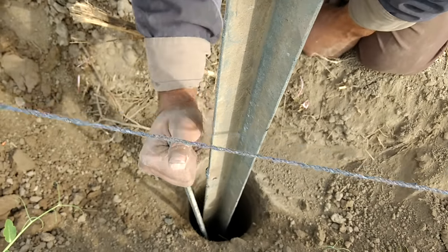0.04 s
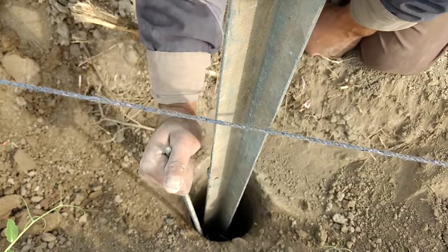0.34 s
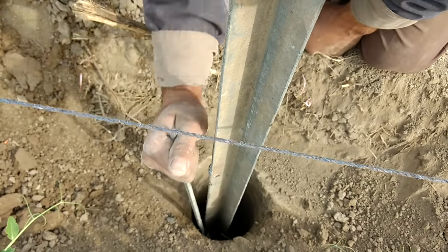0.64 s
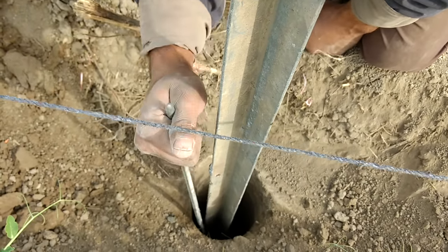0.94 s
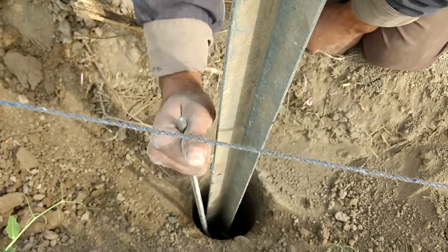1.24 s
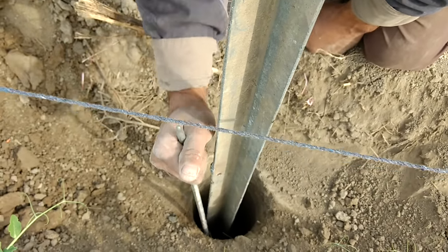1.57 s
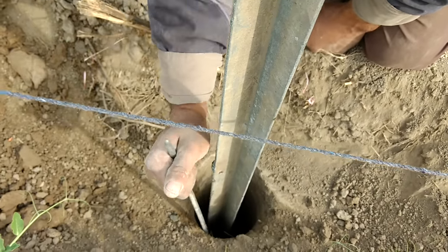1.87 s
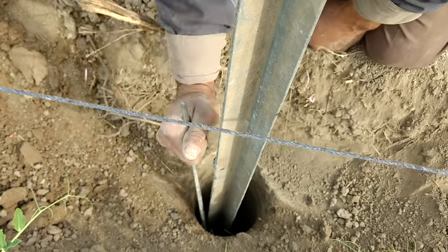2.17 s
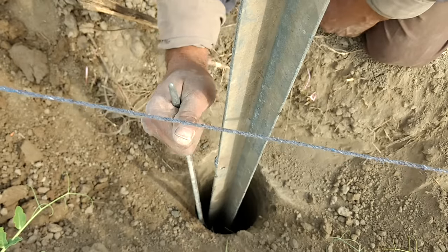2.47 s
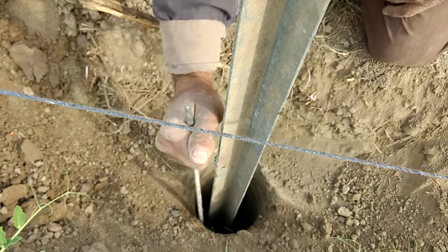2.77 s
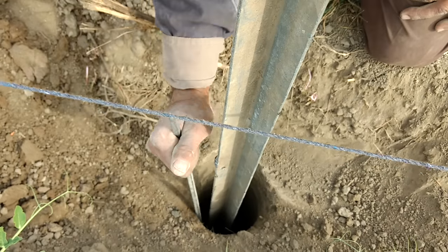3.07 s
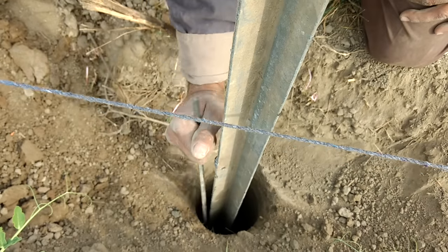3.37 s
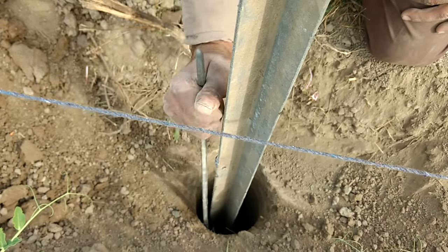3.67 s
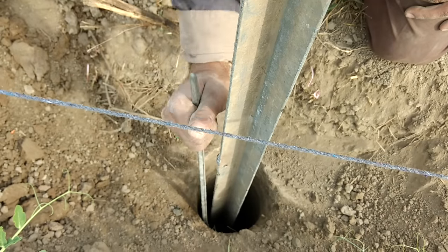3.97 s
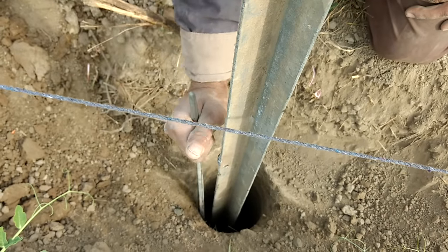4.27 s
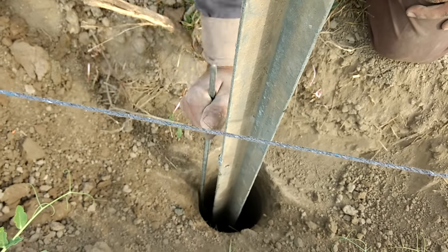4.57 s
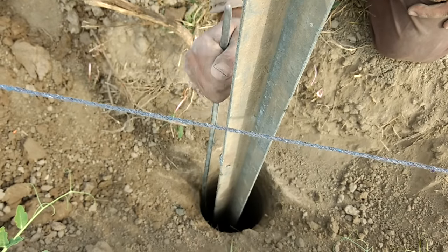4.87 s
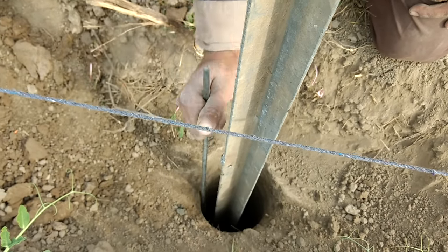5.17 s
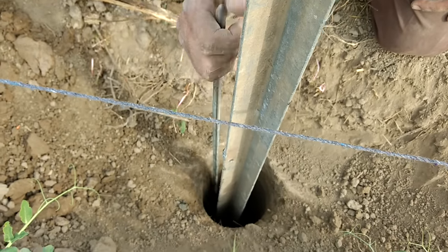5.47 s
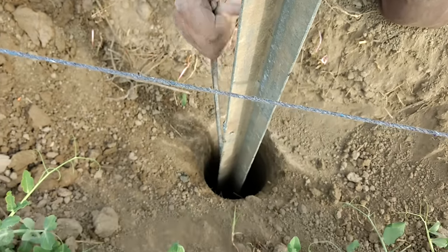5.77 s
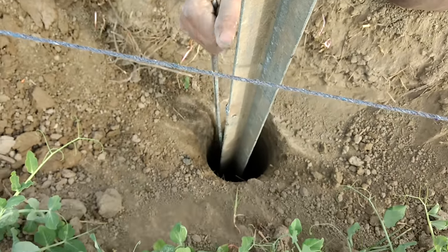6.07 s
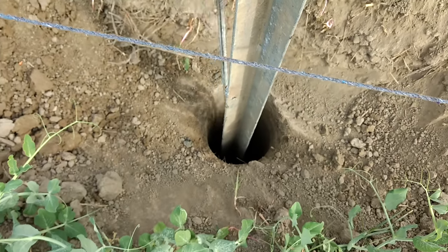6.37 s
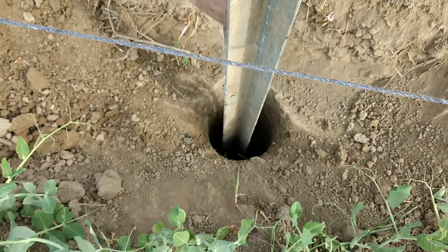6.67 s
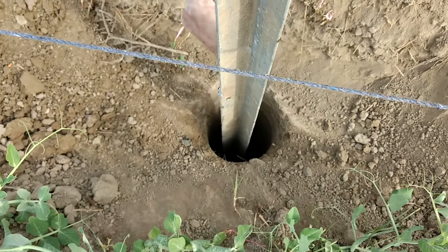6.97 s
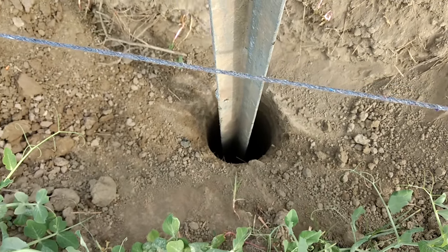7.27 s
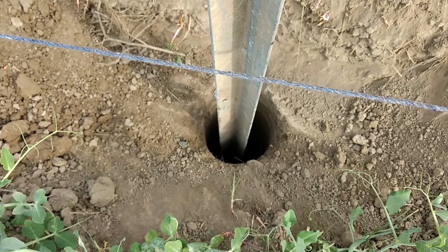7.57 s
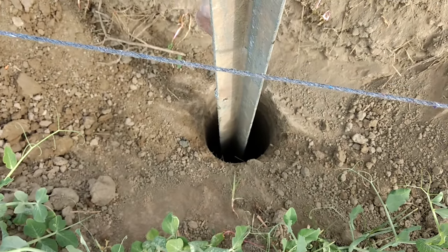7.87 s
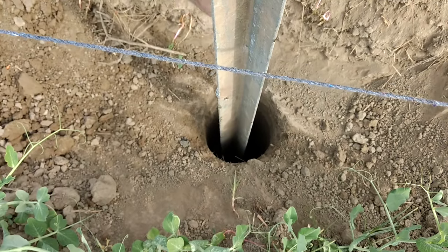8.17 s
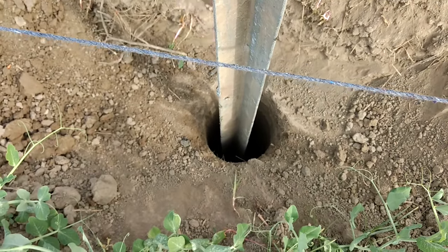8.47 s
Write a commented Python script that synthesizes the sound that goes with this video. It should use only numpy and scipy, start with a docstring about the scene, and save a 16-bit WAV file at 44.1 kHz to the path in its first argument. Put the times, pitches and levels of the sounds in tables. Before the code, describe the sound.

From the start, a thin steel rod is jabbed into wet concrete in a narrow hole, close by, roughly every 0.4 seconds. Each jab is a short gravelly crunch with a low hollow thud and a thin, high metallic ring. Softer gritty scrapes follow as the rod is drawn back. It clinks against a steel post now and then, most clearly at about 0.9 and 4.3 seconds. After a slight hesitation just past 5 seconds, the jabbing continues until about 8.5 seconds. Wind rumbles on the microphone throughout, strongest around 2 seconds, with low pops during the first 4.5 seconds, the loudest near 0.5. It gusts again near 5 and 6 seconds, then eases. Far behind, in a quiet outdoor hush, a machine chuffs faintly about ten times a second, drifting in and out and speeding up slightly. The stereo sound is wide.

```python
"""A thin steel rod is jabbed again and again into wet concrete in a narrow hole, beside a steel post.
Each jab first grinds through gravel, then makes the hole thud, and leaves the steel ringing. On its way
back up the rod scrapes and now and then clinks on the post. Wind buffets the microphone throughout, with
pops in the first half, and eases near the end. Behind it all a far machine chuffs, slowly speeding up
in the outdoor hush. The recorder widens the sound into stereo."""
import sys
import numpy as np
from scipy import signal
from scipy.fft import rfft, irfft, next_fast_len
from scipy.io import wavfile
from scipy.ndimage import map_coordinates

SR = 44100
rng = np.random.default_rng(int(sys.argv[2]) if len(sys.argv) > 2 else 0)


def wav_out(sig):
    """Save sig, one row per channel (or a flat mono array), as 16-bit PCM at SR to the path in sys.argv[1]."""
    wavfile.write(sys.argv[1], SR, np.round(np.clip(np.atleast_2d(sig).T, -1, 1) * 32767).astype(np.int16))


N = 380583

# Each row: start and length of a jab in seconds, then levels in dB of the entry grit, deep grit,
# wet crunch, thud, the long-singing 3327 Hz ring tone and the other ring tones.
JABS = [(.152, 0.053, -29.5, -26, -30, -22, -38, -42), (0.523, 0.07, -24.5, -27.5, -32, -35, -33.5, -39),
        (0.924, 0.041, -31.5, -24, -33.5, -23.5, -36.5, -38),
        (1.289, 0.04, -34.5, -33.5, -34.5, -20, -46, -52),
        (1.685, 0.0452, -34.5, -28.5, -30.5, -24, -44, -55),
        (2.064, 0.061, -35.5, -28.5, -28.5, -22.5, -48, -38),
        (2.466, 0.053, -33, -28, -30.5, -26, -43, -57), (2.866, 0.037, -22.5, -27, -28, -21, -41.5, -41),
        (3.246, 0.047, -32, -27.5, -32, -23, -44, -53), (3.645, 0.04, -38, -35, -35, -32, -51, -56),
        (4.039, .031, -31.5, -28.5, -26, -19, -48, -42.5), (4.445, 0.049, -26.5, -28, -33.5, -18, -48, -38),
        (4.846, 0.035, -29, -26.5, -30.5, -19, -45, -49),
        (5.485, 0.036, -32, -35.5, -42.5, -28.5, -64, -61),
        (5.956, 0.0498, -28, -24.5, -28, -19, -43, -36.5), (6.371, 0.0411, -27, -27, -29, -16.5, -52, -57),
        (6.778, .031, -23.5, -23.5, -28, -20.5, -42, -54), (7.217, 0.029, -29, -25, -27, -22, -51, -63),
        (7.633, 0.066, -30.5, -32, -34, -26, -45, -54), (8.059, 0.062, -28, -29.5, -32, -23.5, -62, -66),
        (8.513, .021, -27, -27, -27, -21, -51, -55)]
# Spectra of gravel and of wet paste. Each row: frequency in Hz, relative level in dB.
GRIT_SPECTRUM = [(150, -55), (450, -8), (1000, -10.5), (2000, -1), (2900, -1.5), (3700, -1), (4200, 0),
                 (4500, -3.5), (6000, -4.5), (8000, -10), (11000, -12.5), (15000, -17.5)]
CRUNCH_SPECTRUM = [(100, 1), (280, 7.5), (420, -6.5), (600, 4), (770, -3.5), (1200, 2.5), (1800, -4),
                   (2600, -36), (5000, -32), (12000, -62)]
def jabs(attack=0.0091, stop_t60=0.062, crunch_t60=0.046, deepest=0.84):
    """Granular friction: the tip grinds gravel, the paste crunches as it sinks, both die as it stops."""
    t, grit, crunch = np.arange(N) / SR, np.zeros(N), np.zeros(N)
    for s, length, entry_db, deep_db, crunch_db, *_ in JABS:
        near = slice(int((s - .02) * SR), int((s + .25) * SR))
        age = t[near] - s
        bite = np.clip(age / attack + .5, 0, 1)
        sinking_db = np.interp(age / length, [.22, .48], [entry_db, deep_db])
        grit[near] += bite * amp(sinking_db - 60 * np.maximum(age - 0.9 * length, 0) / stop_t60)
        past = age - deepest * length
        rise_db = -11 * np.minimum(past / (deepest * length), 0) ** 2
        decay_db = -60 * np.maximum(past - .005, 0) / crunch_t60
        crunch[near] += bite * amp(crunch_db + rise_db + decay_db)
    stones = grit * coloured(grains(rate=7000, spread_db=-1.5), GRIT_SPECTRUM)
    paste = crunch * coloured(grains(rate=4000, spread_db=5), CRUNCH_SPECTRUM)
    return stones + paste


# The gravel's bite. Each row: time in seconds, treble gain in dB.
SHARPNESS = [(.5, -2.5), (4.5, 0), (8.5, -5)]
def sharpened(x, corner_hz=5500):
    """Contact hardness: bare gravel bites brighter than gravel buried in paste."""
    treble = filtered(x, lambda hz: 1 / (1 + (corner_hz / (hz + 1)) ** 6))
    return x + (amp(curve(SHARPNESS)) - 1) * treble


def thuds(hole_hz=195, t60=0.081, rise=0.005):
    """Cavity resonance: each push into the concrete makes the narrow hole boom."""
    t, out = np.arange(SR // 4) / SR, np.zeros(N + SR)
    shape = (1 - np.exp(-(t / rise) ** 2)) * amp(-60 * t / t60)
    for (s, length, _, _, _, db, *_), detune in zip(JABS, rng.standard_normal(len(JABS))):
        boom = np.sin(2 * np.pi * hole_hz * (1 + 0.014 * detune) * t)
        out[int((s + .47 * length) * SR):][:len(t)] += amp(db) * boom * shape / shape.max()
    return out[:N]


# Modes of the hand-damped rod and the post. Each row: frequency in Hz, bandwidth in Hz, gain in dB.
STEEL_MODES = [(581, 150, -5), (958, 110, -3), (1473, 50, -7), (1800, 35, -6), (2160, 55, -3),
               (2460, 60, -5), (2625, 55, 3), (3015, 50, -3), (3460, 40, -3), (4015, 70, -5),
               (4235, 50, -6), (4800, 90, -4), (5340, 70, -4), (6105, 50, -5), (6730, 40, 2),
               (7470, 60, -2), (7890, 60, -1), (8320, 45, 0), (8710, 45, 2), (9150, 90, -2), (9528, 50, 0),
               (11900, 120, -2), (12900, 70, -2), (13920, 90, -2)]
def steel(force, vary_db=4.0, detune=0.00084):
    """Forced vibration of rod and post: each jab's new grip and contact point favour other modes."""
    out, spare = np.zeros(N + SR), SR // 4
    cuts = [0] + [int((s - .02) * SR) for s, *_ in JABS[1:]] + [N]
    for a, b in zip(cuts, cuts[1:]):
        modes = [(hz * (1 + detune * rng.normal()), width, amp(db + vary_db * rng.normal()))
                 for hz, width, db in STEEL_MODES]
        body = lambda f: 1 + sum(g * 1j * f * w / (hz * hz - f * f + 1j * f * w) for hz, w, g in modes)
        out[a:b + spare] += filtered(np.pad(force[a:b], (0, spare)), body)
    return out[:N]


# Lightly damped modes of the rod, and at 9550 and 11200 Hz the post's edge modes. Each row: frequency in Hz,
# level in dB, 60 dB decay time in seconds.
RING_MODES = [(3327, -4.5, .72), (3868, 1, .42), (4013, -7, .3), (2616, -12, .35), (3110, -14, .3),
              (9550, -3, .09), (11200, -4, .13)]
def ring():
    """Free vibration: modes build up in a jab or clink and sing on; the contact point sets their mix."""
    t, out = np.arange(SR) / SR, np.zeros(N + SR)
    blows = [(s + 0.0075, length, long_db, rest_db) for s, length, *_, long_db, rest_db in JABS]
    blows += [(s, CLINK_ATTACK_S, db - 3, db) for s, *_, db in CLINKS]
    for s, length, long_db, rest_db in blows:
        long_tone, *rest = [amp(db + rng.normal(0, 0.68) - 60 * t / t60) * np.sin(2 * np.pi * hz * t)
                            for hz, db, t60 in RING_MODES]
        build_up = np.minimum(t / length, 1)
        out[int(s * SR):][:len(t)] += (amp(long_db) * long_tone + amp(rest_db) * sum(rest)) * build_up
    hz, _, t60 = RING_MODES[0]  # already singing as the scene opens
    out[:len(t)] += amp(-43.5 - 60 * t / t60) * np.sin(2 * np.pi * hz * t)
    return out[:N]


# Each row: time of a pull in seconds, catch level in dB, slide level in dB.
PULLS = [(.309, -37, -48), (0.696, -46.5, -43.5), (1.081, -49, -51), (1.451, -46, -47), (1.821, -54.5, -46),
         (2.215, -40, -43), (2.622, -55, -50), (2.985, -44.5, -43), (3.383, -58, -46.5),
         (3.798, -43.5, -45.5), (4.212, -61, -50), (4.622, -47.5, -44), (5.008, -65, -55),
         (5.585, -43, -61), (6.118, -46, -50), (6.533, -49.5, -52.5), (6.926, -58.5, -49),
         (7.366, -58, -43), (7.786, -53, -42.5), (8.205, -53.5, -48.5)]
# Spectrum of gritty rubbing. Each row: frequency in Hz, relative level in dB.
SCRAPE_SPECTRUM = [(150, -40), (450, -3.5), (750, -6), (1200, -1), (2200, -3), (4200, -2.5), (4600, -6),
                   (6500, -11), (9000, -16.5), (15000, -20.5)]
def scrapes(uneven_db=2, drag_db=-15, slide_after_s=0.041):
    """Stick-slip friction: drawn back, the rod drags in the sand, catches, then slides free."""
    pressure = np.zeros(N)
    for s, catch_db, slide_db in PULLS:
        pressure += amp(catch_db) * (swell(s, width=0.018) + amp(drag_db) * swell(s, width=0.13))
        pressure += amp(slide_db) * swell(s + slide_after_s, width=.025)
    pressure *= amp(-4.5 + uneven_db * wobble(90))
    return pressure * coloured(grains(rate=2500, spread_db=-2), SCRAPE_SPECTRUM)


# Each row: start of a clink in seconds, level in dB, 60 dB decay time in seconds, ring level in dB.
CLINKS = [(.879, -31, 0.073, -49), (2.308, -40, 0.18, -70), (4.325, -29, 0.091, -43),
          (4.582, -37, 0.076, -53), (5.556, -37.5, .2, -68), (6.707, -37.5, .08, -72)]
CLINK_ATTACK_S = 0.0064
def clinks():
    """Glancing impact: the rod meets the post in a sudden gritty chatter that dies away."""
    t, pressure = np.arange(SR // 3) / SR, np.zeros(N + SR)
    for s, db, t60, _ in CLINKS:
        pressure[int(s * SR):][:len(t)] += amp(db - 60 * t / t60) * np.minimum(t / CLINK_ATTACK_S, 1)
    return pressure[:N] * coloured(grains(rate=5000, spread_db=0), SCRAPE_SPECTRUM)


# The post's response. Each row: frequency in Hz, relative level in dB.
POST_SPECTRUM = [(200, -18), (600, 0), (1500, 0.5), (2400, 4.5), (3600, 2.5), (4200, 8), (5000, -38),
                 (9000, 5), (15000, -35.5)]
def post(x, t60):
    """High modal density: the post's many close modes shimmer on after a contact, never twice alike."""
    t, out = np.arange(SR // 3) / SR, np.zeros(N + SR)
    for start in range(0, N, len(t)):
        tail = coloured(rng.standard_normal(len(t)), POST_SPECTRUM) * amp(-60 * t / t60)
        answer = signal.fftconvolve(x[start:start + len(t)], tail / np.linalg.norm(tail))
        out[start:start + len(answer)] += answer
    return out[:N]


# Each row: time in seconds, wind strength in dB.
WIND_STRENGTH = [(0.0, -53), (0.41, -47.5), (1.18, -52.5), (1.42, -56.5), (1.63, -54), (1.85, -44.5),
                 (2.11, -42.5), (3.0, -54), (3.32, -52), (3.48, -56), (4.06, -60), (4.2, -53.5),
                 (4.83, -48), (5.22, -54.5), (5.82, -46), (6.13, -57), (6.87, -60.5), (8.63, -59)]
# Spectra of the buffeting. Each row: frequency in Hz, relative level in dB.
RUMBLE_SPECTRUM = [(15, -36), (35, -4.5), (60, -3), (90, 2.5), (120, 4), (160, 1.5), (200, -19.5),
                   (270, -36), (400, -42), (900, -59)]
FLUTTER_SPECTRUM = [(60, -32), (170, -2.5), (250, -2), (330, -9), (450, -22.5), (700, -26), (1500, -80)]
def wind(buffet_db=18, swing_db=3.5):
    """Turbulence buffets the microphone, more at each downswing of the arm; strong gusts are brighter."""
    swings = sum(swell(s - 0.0067, width=0.035) for s, *_ in JABS)
    gust_db = curve(WIND_STRENGTH) + buffet_db + swing_db * swings + 1.1 * wobble(6) + 2.63 * wobble(22)
    rumble = amp(gust_db - 0.5) * coloured(rng.standard_normal(N), RUMBLE_SPECTRUM)
    flutter_db = 1.41 * gust_db + 5.96 * wobble(35) - 6.5
    return rumble + amp(flutter_db) * coloured(rng.standard_normal(N), FLUTTER_SPECTRUM)


# Each row: time of an eddy in seconds, peak level in dB, pitch in Hz.
EDDIES = [(0.46, -11, 225), (.467, -6, 155), (.470, -5.5, 410), (0.638, -27, 246), (0.667, -19, 216),
          (.696, -22, 318), (0.704, -17.5, 233), (0.772, -19, 192), (0.89, -12, 204), (1.004, -20.5, 168),
          (1.168, -27, 250), (1.951, -16.5, 131), (2.232, -21.5, 195), (2.338, -18, 220), (2.785, -31, 255),
          (3.224, -24, 230), (3.331, -20.5, 138), (3.777, -20, 178), (4.098, -13, 122), (4.222, -19, 127),
          (4.254, -20.5, 184), (4.336, -19.5, 138)]
def pops():
    """Pressure pulses: an eddy on the microphone gives one swing, with a dip before and after."""
    t, out = np.arange(-SR // 20, SR // 20) / SR, np.zeros(N + SR)
    for s, db, hz in EDDIES:
        u = (np.pi * hz * t) ** 2
        out[int((s + t[0]) * SR):][:len(t)] += amp(db) * (1 - 2 * u) * np.exp(-u)
    return out[:N]


# Each row: time in seconds, machine speed in strokes per second.
PUMP_SPEED = [(0, 9.78), (1.7, 9.87), (3.3, 10.2), (4.5, 10.25), (5.7, 10.9), (7.4, 11.25), (8.6, 10.9)]
# Its loudness drifts with the wind. Each row: time in seconds, level in dB.
PUMP_LEVEL = [(.45, -44.5), (1.25, -80), (2.3, -53.5), (3.9, -49), (4.4, -60), (4.75, -52.5), (5.5, -46.5),
              (6.3, -62.5)]
# Each row: frequency in Hz, relative level of the puffs in dB.
PUMP_SPECTRUM = [(400, -24), (900, -7), (1400, 2.5), (2500, 2.5), (3600, -6), (4600, -16.5), (9000, -28)]
def pump(puff_s=0.0048, first_s=0.021):
    """Periodically modulated noise: a far machine, perhaps a water pump, puffs once a stroke."""
    speed = curve(PUMP_SPEED)
    strokes = np.cumsum(speed) / SR - first_s * speed[0]
    puffs = np.exp(-((strokes - np.round(strokes)) / speed / puff_s) ** 2)
    return amp(curve(PUMP_LEVEL)) * puffs * coloured(rng.standard_normal(N), PUMP_SPECTRUM)


# Spectrum of the open air. Each row: frequency in Hz, relative level in dB.
AIR_SPECTRUM = [(100, -16), (450, -3), (800, -3.5), (1400, -1.5), (2100, -4.5), (2900, -5), (4300, -9.5),
                (7000, -13.5), (10000, -17), (15000, -20)]
def hush(level_db=-62.6, diffuse_db=-15):
    """Ambient noise: open air, partly diffuse, with crumbs of soil and concrete shifting in it."""
    noise = rng.standard_normal(N) + amp(diffuse_db) * rng.standard_normal((2, N))
    air = coloured(noise, AIR_SPECTRUM) * amp(0.44 * wobble(7.8))
    crumbs = coloured(grains(rate=170, spread_db=-2.5), SCRAPE_SPECTRUM) * amp(1.5 * wobble(8.8))
    return amp(level_db) * (air + amp(-15) * crumbs)


def amp(db):
    """Amplitude ratio from decibels."""
    return 10 ** (np.asarray(db) / 20)


def curve(rows):
    """Linear interpolation of (seconds, value) rows, one value per sample."""
    return np.interp(np.arange(N) / SR, *np.transpose(rows))


def wobble(rate):
    """Smooth random modulation, rate knots a second."""
    return map_coordinates(rng.standard_normal(int(N * rate / SR) + 4), [np.arange(N) * rate / SR])


def swell(middle, width):
    """A skewed Gaussian envelope, in seconds: a smooth rise and a slower fall."""
    out = np.zeros(N)
    near = np.arange(max(int((middle - 4 * width) * SR), 0), min(int((middle + 4 * width) * SR), N))
    u = (near / SR - middle) / width
    out[near] = np.exp(-2 * (u / np.where(u < 0, .75, 1.25)) ** 2)
    return out


def grains(rate, spread_db):
    """Shot noise: stone contacts of uneven size, rate a second."""
    sizes = amp(spread_db * np.clip(rng.standard_normal(N), -2, 2)) * rng.standard_normal(N)
    return sizes * (rng.random(N) < rate / SR)


def filtered(x, response):
    """Linear filtering: the spectrum of x times a complex frequency response."""
    n = x.shape[-1]
    m = next_fast_len(n + SR // 2)
    return irfft(rfft(x, m) * response(np.fft.rfftfreq(m, 1 / SR)), m)[..., :n]


def coloured(x, spectrum):
    """Spectral shaping by (Hz, dB) points on a log axis, scaled to rms 1."""
    f, db = np.transpose(spectrum)
    shaped = filtered(x, lambda hz: amp(np.interp(np.log(hz + 1), np.log(f), db)))
    return shaped / np.sqrt(np.mean(shaped ** 2) + 1e-20)


def scene():
    """Superposition: rod and post close by; wind, the far machine and open air around them."""
    rod = steel(sharpened(jabs()) + scrapes() + clinks())
    shimmer = amp(-15.5) * np.array([post(rod, t60=0.13) for side in ("left", "right")])
    return rod + shimmer + ring() + thuds() + wind() + pops() + pump() + hush()


# Each row: frequency in Hz, extra phase of the left side in radians.
SIDE_PHASE = [(165, 0.057), (195, -0.96), (240, -0.35), (340, -0.038), (450, -0.58), (750, -0.053),
              (1150, -0.053), (1520, 0.31), (1700, 0.83), (1850, -1.19), (2200, -0.00089)]
# Each row: frequency in Hz, left minus right level in dB.
SIDE_BALANCE = [(60, 0.5), (110, -0.5), (200, 1.5), (380, 0), (700, 2), (1290, -1), (2380, 1), (4400, -1),
                (8120, 0.0), (15000, -0.5)]
def record(dry, delay_s=.000563, top_hz=15450):
    """Phase widening: the recorder delays the left side, inverts the right, and limits the band."""
    lag = lambda hz: np.exp(1j * (np.interp(hz, *np.transpose(SIDE_PHASE)) - 2 * np.pi * hz * delay_s))
    lean = lambda hz: amp(np.interp(hz, *np.transpose(SIDE_BALANCE)) / 2)
    wide = filtered(dry, lambda hz: np.array([lag(hz) * lean(hz), -1 / lean(hz)]))
    return filtered(wide, lambda hz: 1 / np.sqrt(1 + (hz / top_hz) ** 160))


dry = scene()
out = record(dry)
wav_out(out)
```